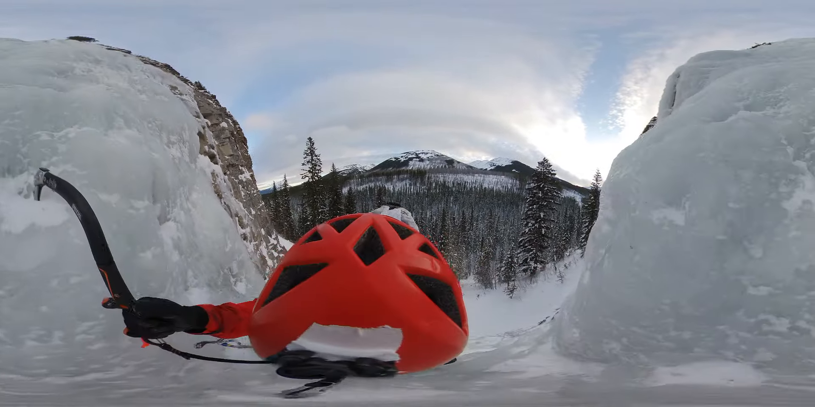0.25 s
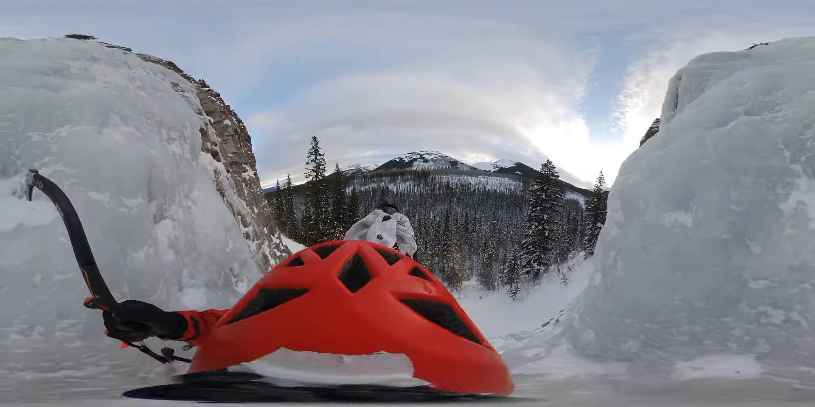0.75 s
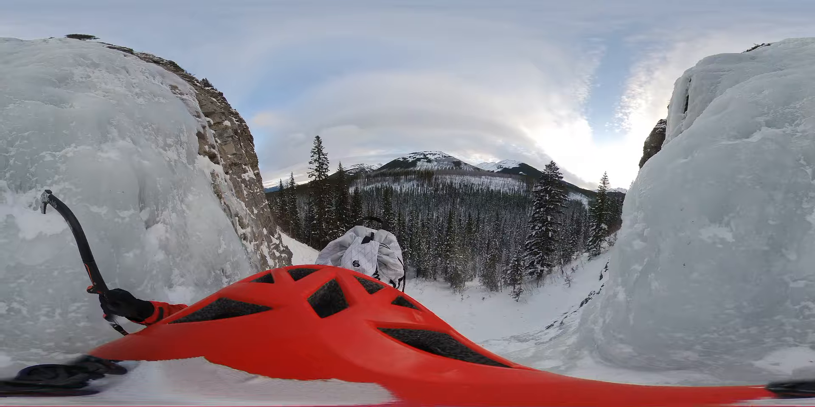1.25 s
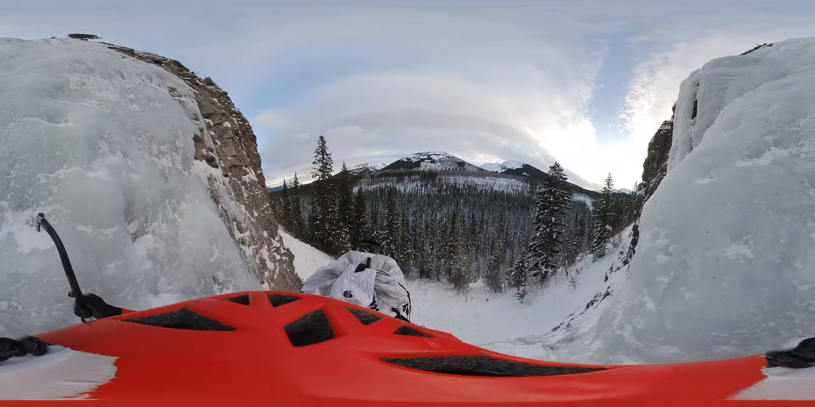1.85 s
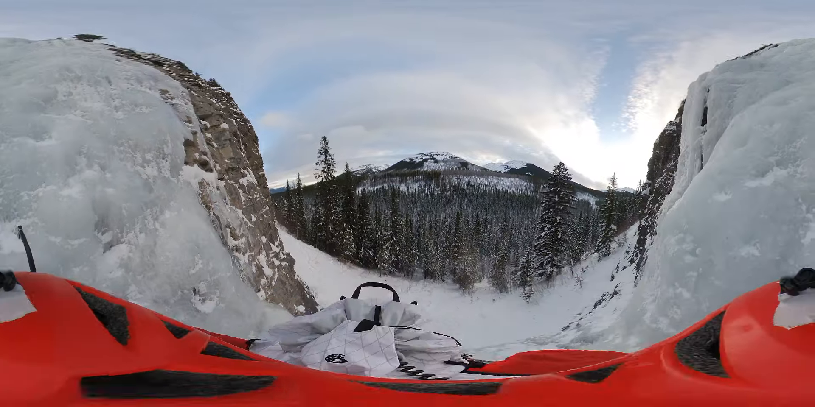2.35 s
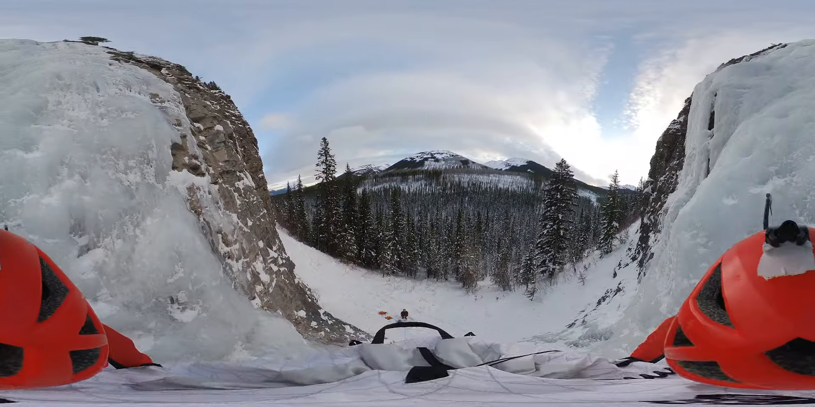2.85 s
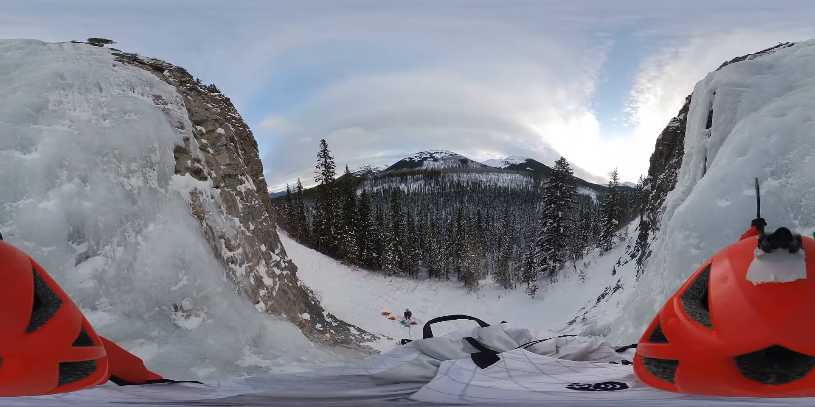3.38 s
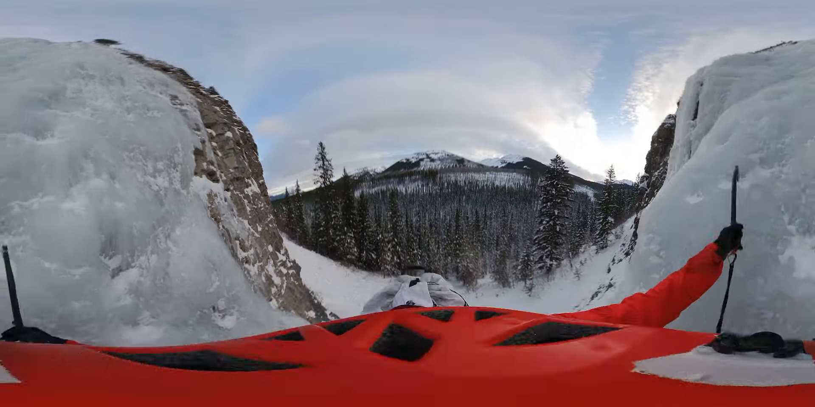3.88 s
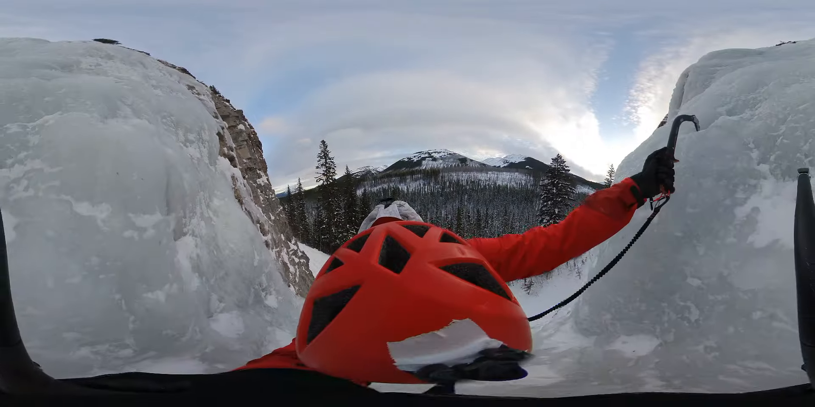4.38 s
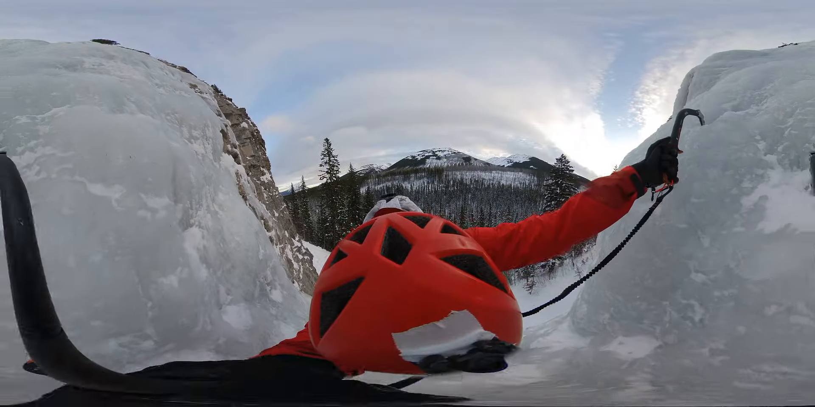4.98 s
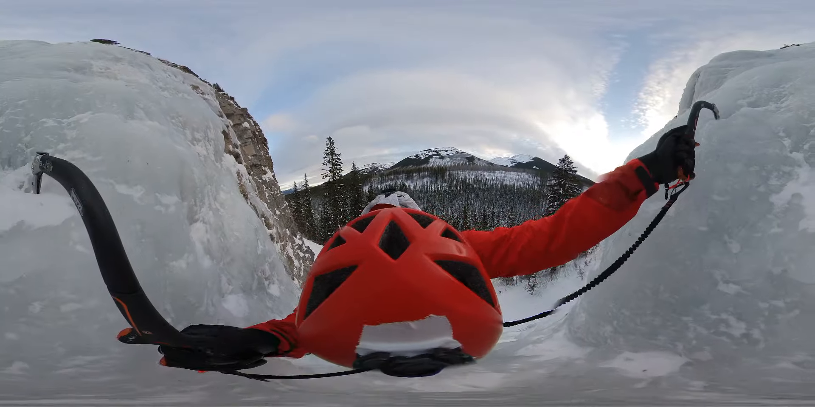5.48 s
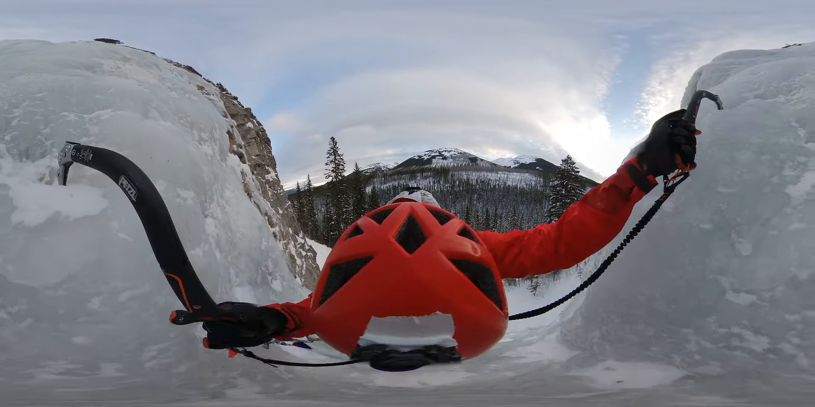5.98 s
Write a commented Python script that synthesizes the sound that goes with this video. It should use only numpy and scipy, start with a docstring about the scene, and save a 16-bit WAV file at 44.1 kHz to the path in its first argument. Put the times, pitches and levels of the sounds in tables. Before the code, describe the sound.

Clothing rustles and steel scrapes and jangles over ice, then one hard pick blow cracks in, followed by heavy boot kicks and small metallic clinks.

```python
"""Climber on a frozen waterfall

Two microphone ports on the helmet hear wind, clothing, ice and steel. Light wind is lumpy low noise, with
puffs mostly on the right port. Rustling clothes, dragged gear and cracking ice are dense grains in three
colours, with pings of breaking chips and rings of dragged steel. Harness gear rings in decaying modes;
boot kicks and one hard blow of the pick are bursts of shattering noise that drive resonances."""
import sys
import numpy as np
from scipy import signal
from scipy.fft import rfft, irfft
from scipy.io import wavfile

SR = 44100
rng = np.random.default_rng(int(sys.argv[2]) if len(sys.argv) > 2 else 0)


def dump(signal):
    """Clip the signal to [-1, 1] and save it as 16-bit WAV at the path in sys.argv[1]."""
    limited = np.clip(np.atleast_2d(signal).T, -1, 1)
    pcm = np.round(limited * 32767).astype(np.int16)
    wavfile.write(sys.argv[1], SR, pcm)


N = 274743
CUTOFF_HZ = 15950


def from_db(db):
    """Logarithmic level: decibels become an amplitude factor."""
    return 10 ** (np.asarray(db) / 20)


def rms_one(x):
    """Normalisation of power: scales a signal to rms 1."""
    return x / np.sqrt(np.mean(x ** 2) + 1e-20)


def in_time(rows):
    """Linear interpolation: one signal for each column after the time column."""
    s, *columns = np.transpose(rows)
    return [np.interp(np.arange(N) / SR, s, column) for column in columns]


def at_hz(points, column=1):
    """Interpolation on a log-frequency axis: a table read at every FFT bin."""
    hz = np.maximum(np.arange(N // 2 + 1) * SR / N, 10)
    points = np.array(points)
    return np.interp(np.log(hz), np.log(points[:, 0]), points[:, column])


def coloured(x, spectrum):
    """Spectral shaping: multiplies by a spectrum that falls steeply outside its ends; rms 1."""
    (low_hz, low_db), (high_hz, high_db) = spectrum[0], spectrum[-1]
    extended = [(low_hz / 2, low_db - 30), *spectrum, (high_hz * 2, high_db - 30)]
    return rms_one(irfft(rfft(x) * from_db(at_hz(extended)), N))


def drift(rate_hz):
    """Low-passed noise: a double real pole leaves a slow random wander of rms 1."""
    step = 40   # samples between computed points
    r = np.exp(-2 * step * np.pi * rate_hz / SR)
    noise = rng.standard_normal(N // step + 2002)
    slow = signal.lfilter([1], [1, -2 * r, r * r], noise)[2000:]   # settled part
    return np.interp(np.arange(N) / step, np.arange(len(slow)), rms_one(slow))


def resonances(x, modes):
    """Modal superposition: parallel two-pole resonances of unit peak gain, weighted, signs alternating."""
    out = 0
    for k, (hz, width_hz, level_db) in enumerate(modes):
        r = np.exp(-np.pi * width_hz / SR)
        poles = [1, -2 * r * np.cos(2 * np.pi * hz / SR), r * r]
        zeros = [(1 - r * r) / 2, 0, (r * r - 1) / 2]
        out = out + (-1) ** k * from_db(level_db) * signal.lfilter(zeros, poles, x)
    return out


def bursts(rows):
    """Exponential growth and decay: the envelope of brief contacts."""
    out = np.zeros(N)
    for s, level_db, rise_s, t60_s in rows:
        t = np.arange(max(0, int((s - .03) * SR)), min(N, int((s + .3) * SR)))
        late = t / SR - s
        rise = np.exp(late / max(rise_s, 1e-4))
        decay = from_db(-60 * late / max(t60_s, 2e-3))
        out[t] += from_db(level_db) * np.where(late < 0, rise, decay)
    return out


def strokes(rows):
    """Sustained excitation: the envelope of drags that start fast, change level and stop short."""
    rise_s, stop_s = .003, 0.0079
    out, t = np.zeros(N), np.arange(N) / SR
    for start, length, level_db, fade_db in rows:
        near = slice(int((start - .03) * SR), int((start + length + .06) * SR))
        late = t[near] - start
        hold = from_db(level_db + fade_db * np.clip(late / length, 0, 1))
        before, after = np.minimum(late, 0), np.maximum(late - length, 0)
        out[near] += hold * np.exp(before / rise_s - after / stop_s)
    return out


def grains(per_s, spread_db):
    """Poisson-like shot noise: two unrelated streams of single-sample clicks of uneven size."""
    excess_db = spread_db * np.minimum(rng.exponential(1, (2, N)), 5)
    sizes = from_db(excess_db) * rng.choice([-1, 1], (2, N))
    return sizes * (rng.random((2, N)) < per_s / SR)


def struck(blows, modes, pivot_hz, lowest):
    """Forced resonance: shattering noise under a contact drives the modes of the striking body."""
    shards = rms_one(grains(30000, 0.56)) * from_db(16.0)
    out = 0
    for k, mode in enumerate(modes):
        octaves = np.clip(np.log2(mode[0] / pivot_hz), lowest, 1.2)   # tilt levels off at both ends
        force = bursts((s, level_db + tilt * octaves, rise_s, t60_s)
                       for s, level_db, rise_s, t60_s, tilt in blows)
        out = out + (-1) ** k * resonances(shards * force + 1e-18, [mode])
    return out


def rung(hits, modes_hz, modes):
    """Free vibration: each knock rings mostly the modes near the pitch that it favours."""
    out = np.zeros((2, N))
    s, level_db, favoured_hz, spread_octaves = np.transpose(hits)
    for k, (hz, (mode_db, t60_s)) in enumerate(zip(modes_hz, modes)):
        away = np.log2(hz / favoured_hz) / spread_octaves
        clicks = np.full(N, 1e-18)
        clicks[(s * SR).astype(int)] = from_db(level_db + mode_db - 6 * away ** 2)
        r, w = from_db(-60 / (t60_s * SR)), 2 * np.pi * hz / SR
        ring = signal.lfilter([.5, 0, -.5], [1, -2 * r * np.cos(w), r * r], clicks)
        out += [ring, np.roll(ring, 3 + 5 * k)]   # the second path differs for every mode
    return out


def ports(pair, sharp=0., lag_top_hz=6900, left_treble_db=0.):
    """Partial coherence: the left port hears the sound late and partly by another path."""
    # the two ports: pitch_hz, likeness (0-1), left_over_right_db
    port_table = [(60.1, .5, -5.5), (308, 0.89, -1.5), (700, 0.84, -1.5), (1300, 0.5, -1),
                  (2026, 0.48, -0.5), (3200, 0.17, -2), (6000, 0.11, 0), (7600, 0.94, -1.5),
                  (10000, 0.98, 2), (15000, 0.7, 3)]
    left_lag_s = 12 / 44100
    direct, other = rfft(pair)
    likeness = at_hz(port_table)
    alike = np.clip(likeness + sharp * (1 - likeness), 0, 1)   # sharp blows stay more alike
    hz = np.arange(N // 2 + 1) * SR / N
    lag = np.exp(-2j * np.pi * hz * left_lag_s * (hz < lag_top_hz))   # the delay applies only below this pitch
    gain = from_db(at_hz(port_table, column=2) + left_treble_db * (hz / CUTOFF_HZ) ** 2)
    left = (alike * direct + np.sqrt(1 - alike ** 2) * other) * lag * gain
    return irfft(np.array([left, direct]), N)


def wind():
    """Turbulent pressure: lumpy low noise, its own on each port, the left sheltered from the puffs."""
    # wind spectrum: pitch_hz, relative_db (per Hz)
    wind_colour = [(20, -13.5), (45, -5), (120, -6), (220, -10), (400, -21.5)]
    # puffs on the right port: peak_s, peak_db, length_s
    puffs = [(0.518, -64.5, 0.053), (1.8, -72, 0.21), (2.96, -73.5, 0.3), (3.81, -69, 0.072),
             (4.47, -57, .05), (4.536, -51, 0.035), (4.58, -41, .03), (4.64, -54, 0.055), (5.0, -71, .15)]
    breeze_db, left_breeze_db, left_share = -80.5, -84.5, 0.33
    rise_db, fall_db = 12, 20.5   # over one puff length
    t = np.arange(N) / SR
    right_db = np.full(N, breeze_db)
    for s, peak_db, length in puffs:
        late = (t - s) / max(length, .005)
        puff_db = peak_db + np.where(late < 0, rise_db * late, -fall_db * late)
        right_db = np.maximum(right_db, puff_db)
    left_db = left_breeze_db + left_share * (right_db - breeze_db)
    lumps = from_db(4.3 * np.array([drift(7.8), drift(25.0)]))
    noise = coloured(rng.standard_normal((2, N)), wind_colour)
    return noise * lumps * from_db([left_db, right_db])


def crumbs(moving):
    """Brittle fracture: chips of ice break at random, each a short ping at one of sixteen pitches."""
    typical_per_s, spread_db = 300, 5.0   # the rate wanders about this value
    ping_cycles = 33   # cycles to fall by 60 dB
    born = rng.random(N) < typical_per_s * from_db(spread_db * drift(25.0)) / SR
    sizes = born * from_db(2.5 * np.minimum(rng.exponential(1, N), 3)) * rng.choice([-1, 1], (2, N))
    pitches_hz, dealt = np.geomspace(500, 7500, 16), rng.integers(0, 16, N)
    pings = 0
    for k, hz in enumerate(pitches_hz):
        width_hz = np.log(1000) / np.pi * hz / ping_cycles
        mode = (hz, width_hz, -3.0 * np.log2(hz / 600))
        pings = pings + resonances(sizes * (dealt == k) + 1e-18, [mode])
    return from_db(-6) * rms_one(pings) * moving


def jangle(moving):
    """Impact excitation: sparse knocks under the drag each ring one mode of the steel; the loudest are placed."""
    # resonances of the dragged steel: pitch_hz, width_hz, level_db
    hardware = [(700, 110, -13.5), (1400, 63, -0.5), (1800, 80, -13), (2400, 37, -7), (2800, 20, -11.5),
                (3200, 24, -3.5), (3800, 57, 1), (4500, 140, -5.5), (5000, 300, -3.5), (6100, 57, -3),
                (7050, 39, -2)]
    # the loudest knocks: start_s, level_db, favoured_hz
    loud_knocks = [(1.49, -54, 3800), (1.525, -38.5, 3200), (1.528, -25, 4200), (1.534, -41, 1400),
                   (1.542, -48, 3200), (1.548, -29, 700), (1.594, -32, 5000), (1.765, -40.5, 3800),
                   (1.804, -42, 1400), (1.815, -41, 7050), (1.885, -31.5, 2800), (1.895, -37, 1800),
                   (1.922, -33, 4500), (1.938, -40, 7050), (2.02, -40.5, 1400), (2.036, -31, 5000),
                   (2.158, -44, 6100), (2.185, -29.5, 4900), (2.187, -36, 1400), (2.205, -46, 7050),
                   (2.33, -34, 2400), (2.378, -34, 1400), (2.575, -44, 3800), (3.687, -40.5, 3800),
                   (4.475, -55, 3800), (5.108, -39.5, 1400), (5.296, -39, 700)]
    spread_octaves = 0.075
    knocks = rms_one(grains(1200, 3.)) * moving
    dealt = rng.integers(0, len(hardware), N)
    chance = sum(resonances(knocks * (dealt == k) + 1e-18, [mode]) for k, mode in enumerate(hardware))
    modes_hz = [hz for hz, _, _ in hardware]
    # a resonance's width sets its time to fall by 60 dB
    decays = [(level_db, np.log(1000) / np.pi / width_hz) for _, width_hz, level_db in hardware]
    placed = rung([(*knock, spread_octaves) for knock in loud_knocks], modes_hz, decays)
    return from_db(26) * chance + placed


def three_colours(level_db, tilt_db, grit_db):
    """Spectral tilt: levels of the dull, middle and bright grains."""
    return level_db - tilt_db, level_db + grit_db, level_db + tilt_db


def rustle_and_crunch():
    """Granular friction: slipping fibres and ice crystals are dense grains swelling in three colours."""
    # clothing and gear moving: start_s, dull_rub_db, bright_swish_db
    moves = [(0.0, -74, -68.5), (0.29, -68.5, -68.5), (0.55, -66.5, -66.5), (1.58, -66.5, -65),
             (1.72, -61.5, -59.5), (2.2, -60.5, -57), (2.81, -59, -59.5), (3.05, -62.5, -66.5),
             (3.47, -61, -67.5), (3.63, -60, -65), (4.22, -64.5, -64.5), (4.63, -61, -60),
             (4.89, -60.5, -59.5), (5.27, -71.5, -67), (5.48, -67.5, -67), (5.66, -62.5, -65.5),
             (5.93, -69.5, -61), (6.23, -65, -55.5)]
    # ice cracking and cloth snapping: start_s, level_db, tilt_db (bright up, dull down)
    crunches = [(0.386, -60.5, 6.5), (0.61, -62.5, -17.5), (0.626, -57, 1), (0.635, -56, 3),
                (0.696, -56.5, 3), (0.718, -50.5, -2), (0.741, -55, -6), (1.1091, -52, -7.5),
                (1.165, -57.5, -9), (1.199, -61.5, -11), (1.283, -58.5, 5.5), (1.4625, -61, -2.5),
                (1.696, -50, 2), (1.732, -42.5, -3), (1.805, -52.5, 5), (1.8127, -51, 3),
                (1.8837, -66, -6.5), (1.9054, -54.5, 4.5), (2.065, -52.5, -5.5), (2.1166, -54, 10.5),
                (2.157, -59, 8), (2.187, -50.5, 4.5), (2.204, -53, 4), (2.5621, -53, 10), (3.246, -56, -7),
                (3.27, -62, 4), (3.4775, -56, 0), (3.5768, -58, 0), (3.6148, -54.5, -8),
                (3.6671, -47.5, -2), (3.6826, -44, 5.5), (3.804, -67.5, -21.5), (3.8944, -67, -2.5),
                (4.252, -60, 5), (4.3223, -61.5, 8.5), (4.412, -59.5, 6), (4.5514, -62.5, 3.5),
                (4.6662, -55, 4.5), (4.7568, -49.5, 2), (5.1058, -62.5, -7), (5.179, -61.5, -6),
                (5.201, -61, -3), (5.2161, -65.5, -8), (5.242, -57, -2.5), (5.296, -74, -14),
                (5.3613, -70.5, -17), (5.65, -55.5, 14), (5.8462, -53.5, -10), (5.937, -62.5, 11.5),
                (5.9793, -50, 6.5), (6.0084, -59, 11)]
    # points and gear dragged over ice, and the bright shatter around the pick blow (3.985):
    # start_s, length_s, level_db, tilt_db (bright up, dull down), fade_db (over the stroke)
    scrapes = [(0.604, 0.038, -55.5, -1.5, -2), (0.688, 0.054, -58.5, -1, -3.5),
               (1.164, 0.16, -63.5, 1, 2.5), (1.472, 0.033, -62, 2, 3.5), (1.52, 0.085, -53, 1.5, -4),
               (1.725, 0.044, -51, 2.5, -1.5), (1.803, 0.014, -60, 6.5, 3.5), (1.872, 0.11, -54, 5, -7),
               (1.981, 0.031, -64, 4.5, -2), (2.06, 0.11, -62, 6.5, -3), (2.258, 0.07, -59.5, 6, 3),
               (2.379, 0.017, -49.5, 3, -12), (2.464, 0.095, -72.5, 4.5, 9),
               (2.562, 0.051, -53, 4.5, -16.5), (2.662, 0.178, -69.5, 2.5, 3),
               (3.672, 0.015, -52.5, -2, -4.5), (3.985, 0.038, -42, 5, -6), (4.171, 0.014, -69, 8, -0.5),
               (4.446, 0.035, -66.5, -1, 2.5), (5.48, 0.078, -55, -3.5, -19.5),
               (5.784, 0.1, -76, -12.5, -0.5), (6.126, 0.039, -63.5, 2, 15)]
    # spectra of the dull, middle and bright grains: pitch_hz, relative_db (per Hz)
    rub = [(150, -11.5), (300, -6.5), (550, -1.5), (1100, 0.5), (2000, -3.5), (3000, -16)]
    grit = [(1500, -17), (2500, -1), (3500, -1), (5000, -8.5), (7000, -8.5)]
    swish = [(4000, -1), (6000, -1.5), (8000, -1.5), (11000, -2.5), (14000, -3), (16000, 3)]
    # middle colour, against the mean of dull and bright
    grit_move_db, grit_crunch_db, grit_scrape_db = -5, 2.5, 1.5
    crunch_rise_s, crunch_t60_s = 0.0005, 0.027

    s, peak_db, snap_tilt_db = np.transpose(crunches)
    start, length, level_db, drag_tilt_db, fade_db = np.transpose(scrapes)
    rub_db, swish_db = in_time(moves)
    moves_db = rub_db, (rub_db + swish_db) / 2 + grit_move_db, swish_db
    drags_db = three_colours(level_db, drag_tilt_db, grit_scrape_db)
    snaps_db = three_colours(peak_db, snap_tilt_db, grit_crunch_db)
    # spectrum, grains per second, spread of sizes in dB,
    # depth of the flicker in dB, partly shared by the colours
    layers = [(rub, 2500, 2.5, 1.5), (grit, 9000, 2.5, 1.5), (swish, 20000, 2.2, 1.1)]
    together, out, drags = drift(20.6), 0, []
    for layer, move_db, drag_db, snap_db in zip(layers, moves_db, drags_db, snaps_db):
        colour, per_s, spread_db, flicker_db = layer
        steady = from_db(move_db + flicker_db * (together + 1.8 * drift(27.0)))
        stutter = from_db(3.5 * drift(60))   # the point stutters
        drag = strokes(zip(start, length, drag_db, fade_db)) * stutter
        snaps = bursts((at, db, crunch_rise_s, crunch_t60_s) for at, db in zip(s, snap_db))
        envelope = np.sqrt(steady ** 2 + drag ** 2 + snaps ** 2)   # powers add
        out = out + coloured(grains(per_s, spread_db), colour) * envelope
        drags.append(drag)
    middle_drag, middle_db = drags[1], moves_db[1]
    chips = crumbs(middle_drag + from_db(middle_db - 2.5))
    return out + chips + jangle(middle_drag + from_db(middle_db - 15.5))


def ice_screw():
    """Modal ringing: an ice screw swinging on the harness tinkles in four decaying modes."""
    # tinkles: start_s, level_db, favoured_hz, spread_octaves
    tinkles = [(2.68, -66.5, 7000, 0.4), (3.09, -65, 6400, 0.1), (5.126, -59, 3800, 0.15),
               (5.127, -62.5, 7100, .05), (5.241, -63.5, 3800, 0.97), (5.73, -62, 6380, .1),
               (5.905, -67.5, 6430, .1)]
    # mode pitches: pitch_hz
    screw_hz = [3800, 6400, 7100, 11800]
    # the same modes: level_db, t60_s
    screw = [(0, 0.29), (0, 0.23), (0, 0.15), (0, 0.12)]
    return rung(tinkles, screw_hz, screw)


def carabiner():
    """Modal ringing: a knocked carabiner clinks in ten decaying modes."""
    # clinks, one knock near 6.045 given as three pitches: start_s, level_db, favoured_hz, spread_octaves
    clinks = [(5.937, -51, 6000, 0.35), (5.980, -33.5, 8850, 1.16), (6.008, -47.5, 6000, 0.79),
              (6.046, -40, 3375, .15), (6.047, -48.5, 8790, .15), (6.044, -42, 15220, .1),
              (6.063, -39, 10000, .07)]
    # mode pitches: pitch_hz
    carabiner_hz = [3375, 5050, 6600, 4700, 8790, 9940, 12300, 13146, 15137, 15311]
    # the same modes: level_db, t60_s
    carabiner_modes = [(-18.5, 0.091), (2, 0.038), (4, 0.015), (-9, 0.014), (-10.5, 0.069), (-14, 0.031),
                       (-19, 0.071), (-13.5, 1), (-1, .08), (-3, .12)]
    return rung(clinks, carabiner_hz, carabiner_modes)


def boot_kicks():
    """Impact on a hollow body: kicks and low after-thumps drive wide resonances of boot and ice."""
    # kicks, their low after-thumps, and the pick blow's after-thump (4.03):
    # start_s, level_db, rise_s, t60_s, tilt_db (per octave)
    kicks = [(2.32, -58, 0.0036, 0.069, 6), (2.565, -47, 0.0032, 0.05, -1), (4.03, -66.5, .01, .15, -5),
             (5.495, -32.5, 0.0062, 0.051, 0), (5.52, -70, 0.01, 0.24, -11),
             (5.846, -40.5, 0.0012, 0.015, -0.5), (6.151, -27.5, 0.0042, 0.027, -0.5),
             (6.18, -47, 0.0099, 0.15, -3)]
    # boot and hollow ice: pitch_hz, width_hz, level_db
    boot = [(55, 28, -9.5), (149, 60, -4.5), (311, 96, 0), (479, 45, 3.5), (789, 65, 2), (940, 200, 5),
            (1040, 380, 1.5), (3130, 4000, -19.5), (10000, 13000, -22)]
    return struck(kicks, boot, 400, lowest=-3)


def pick_blow():
    """Impact with fracture: the biting pick drives the resonances of its steel and shaft in the ice."""
    # touch, shattering, blow, ring-through, crumbs, rebound:
    # start_s, level_db, rise_s, t60_s, tilt_db (per octave)
    blows = [(3.969, -48, 0.0011, 0.13, -4.5), (3.99, -41, 0.0009, 0.1, 3),
             (3.995, -12, 0.00065, 0.011, -5.5), (3.9975, -26, 0.00064, 0.0086, -6.5),
             (4.003, -35, 0.0022, 0.041, -11), (4.048, -52.5, 0.0021, 0.069, 0)]
    # steel pick and shaft in the ice: pitch_hz, width_hz, level_db
    pick = [(343, 40, -21.5), (700, 65, -11.5), (1074, 180, -14), (1700, 330, -15), (2670, 130, -1),
            (3040, 540, -1), (3603, 520, 1.5), (4200, 600, -22.5), (5370, 190, 5), (7000, 120, 4.5),
            (8350, 120, 1.5), (5000, 4200, -9.5), (11500, 3900, -12.5), (14800, 850, -21.5),
            (3470, 980, -9.5)]
    return struck(blows, pick, 2800, lowest=-0.41)


def scene():
    """Linear superposition: all sources add at the two ports."""
    friction = ports(rustle_and_crunch())
    metal = ports(carabiner() + ice_screw(), sharp=.7)
    boots = ports(boot_kicks(), sharp=.8)
    pick = ports(pick_blow(), sharp=0.9, lag_top_hz=SR / 2, left_treble_db=6.5)
    return wind() + friction + metal + boots + pick


def record(dry):
    """Band limiting: a steep low-pass filter cuts the top treble."""
    low_pass = signal.cheby2(16, 70, CUTOFF_HZ + 250, fs=SR, output="sos")   # 70 dB down at this edge
    return signal.sosfilt(low_pass, dry)


dry = scene()
out = record(dry)
dump(out)
```